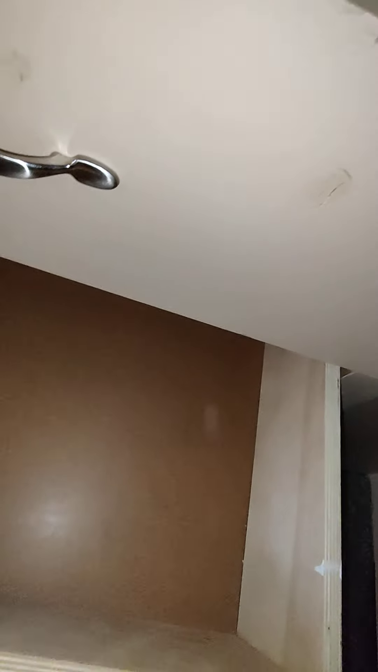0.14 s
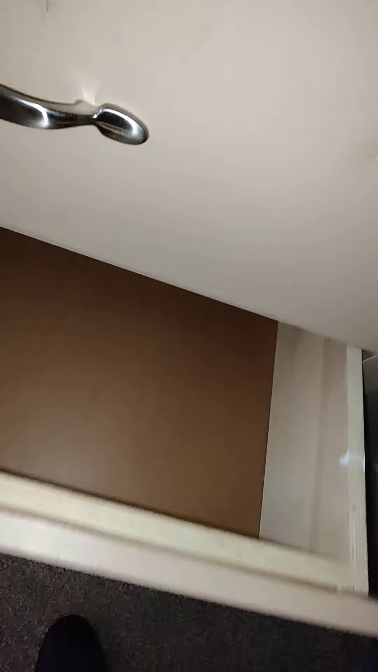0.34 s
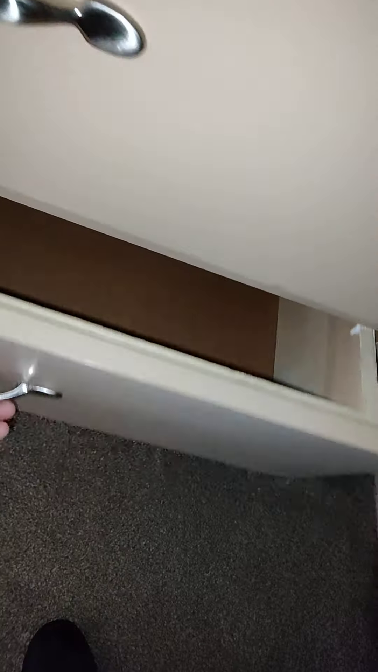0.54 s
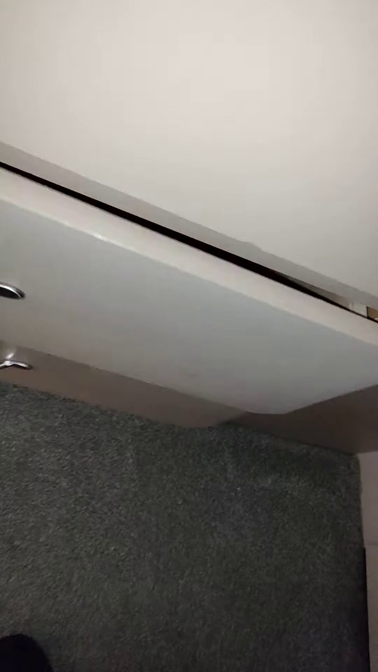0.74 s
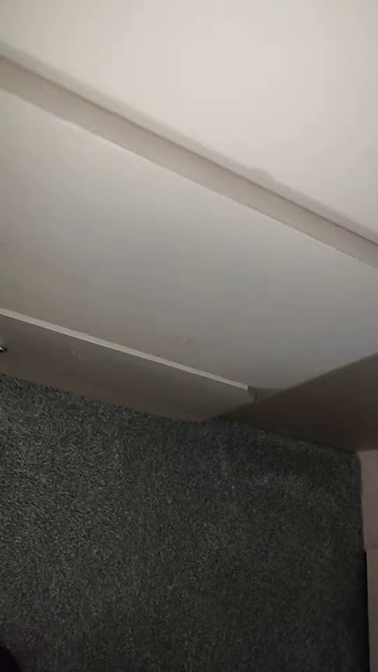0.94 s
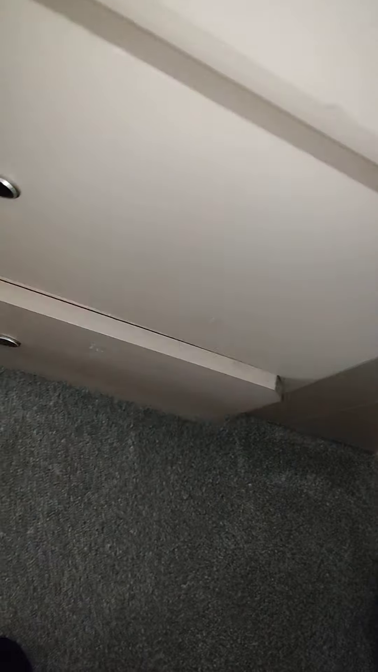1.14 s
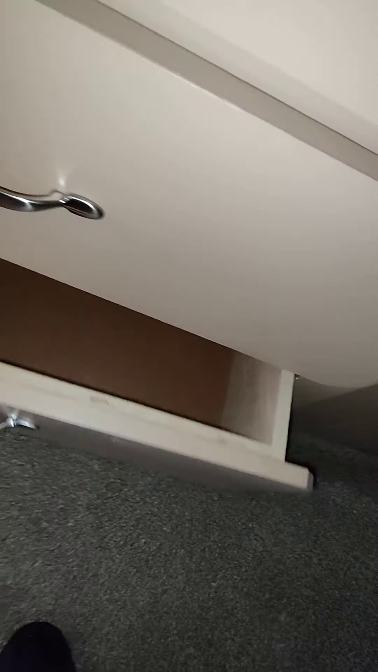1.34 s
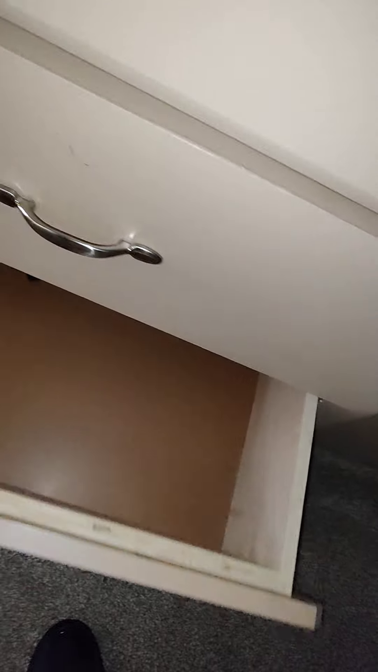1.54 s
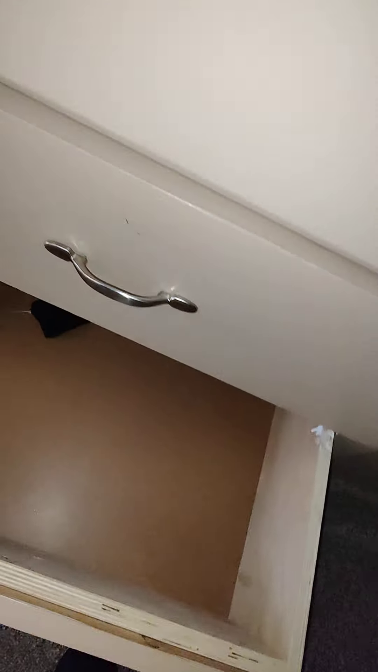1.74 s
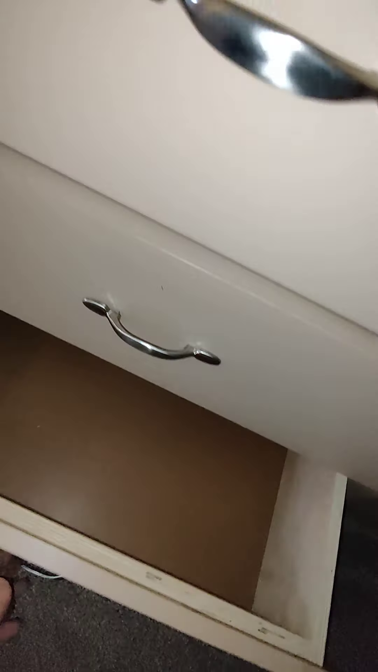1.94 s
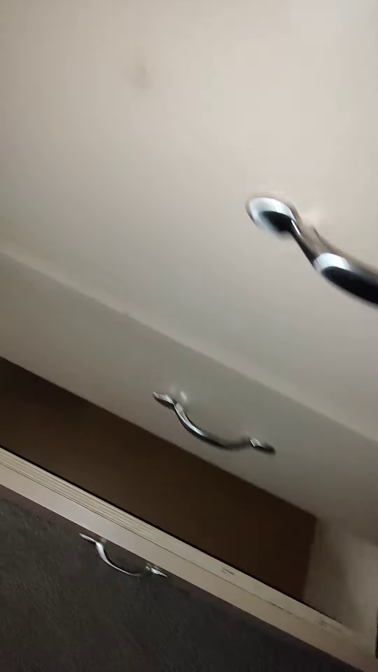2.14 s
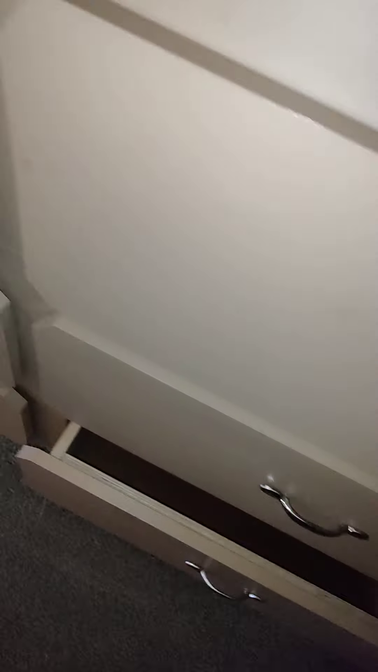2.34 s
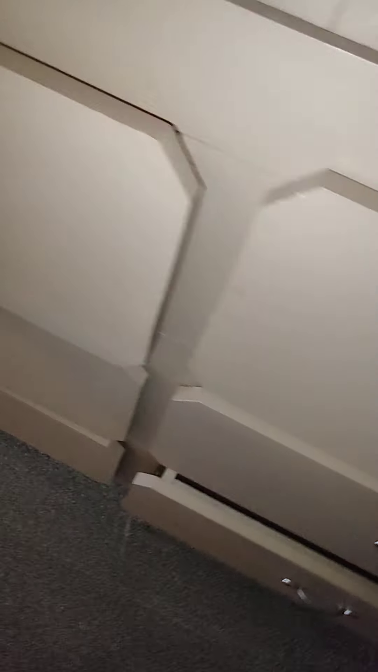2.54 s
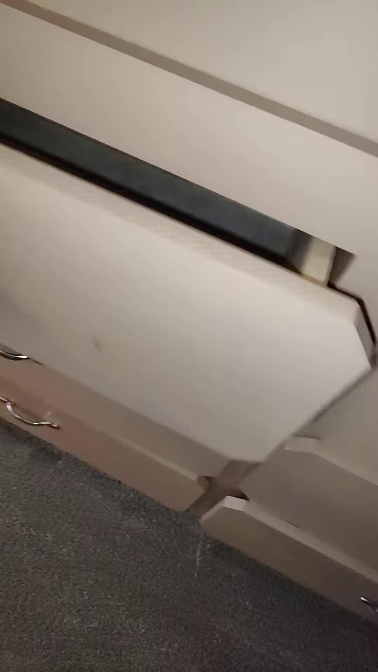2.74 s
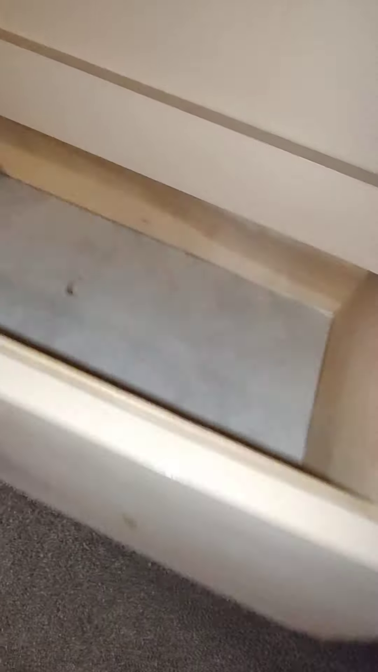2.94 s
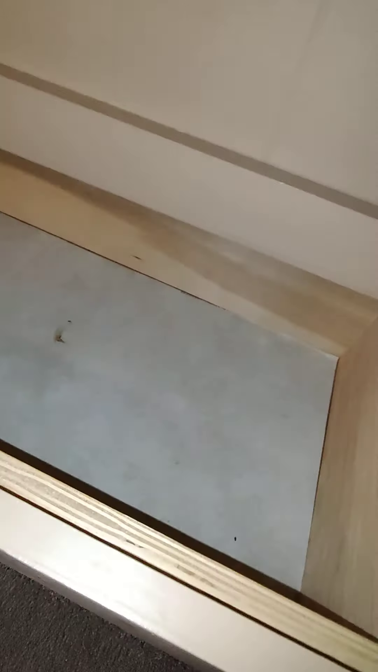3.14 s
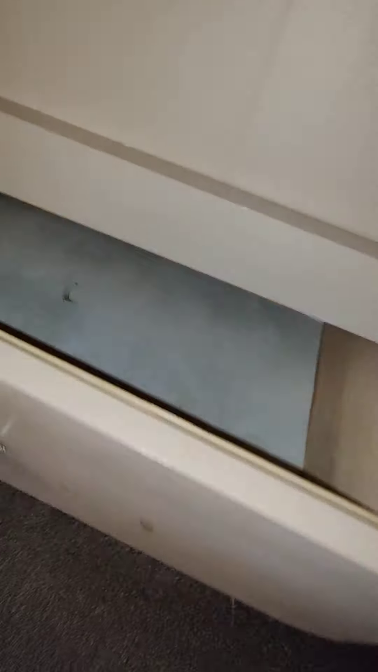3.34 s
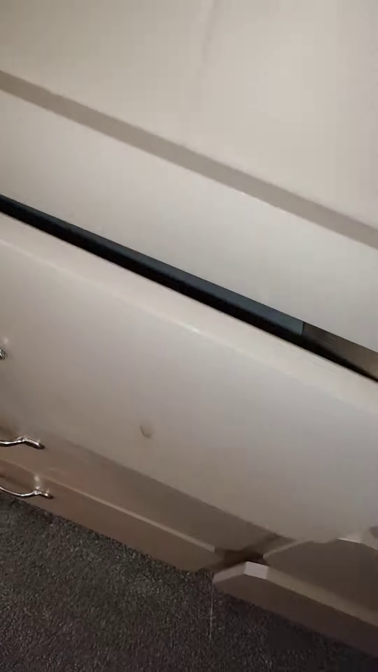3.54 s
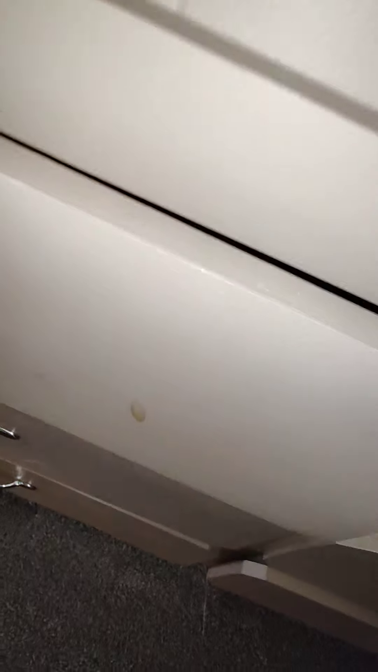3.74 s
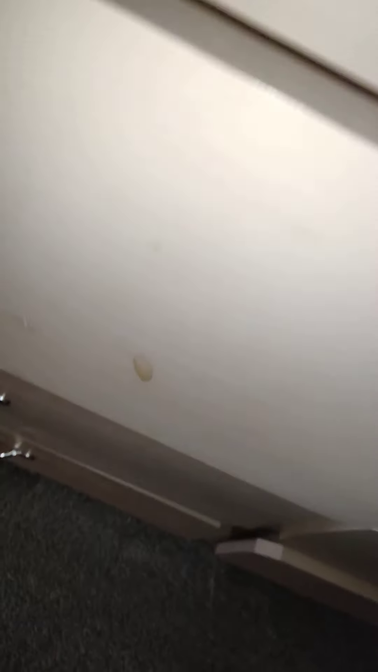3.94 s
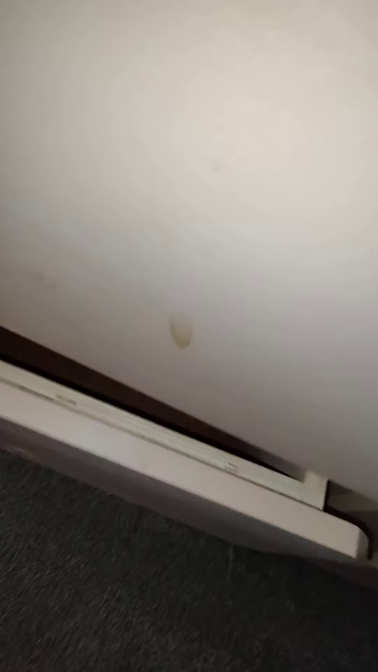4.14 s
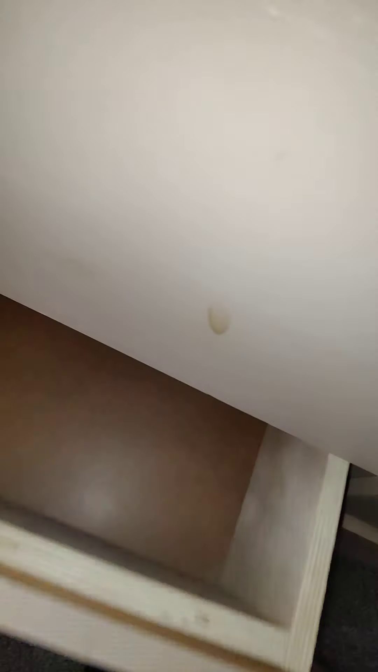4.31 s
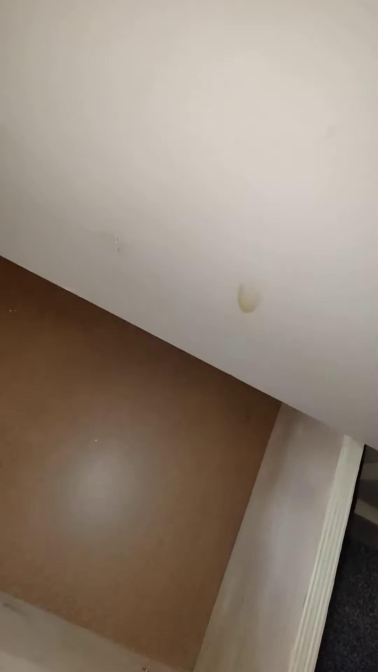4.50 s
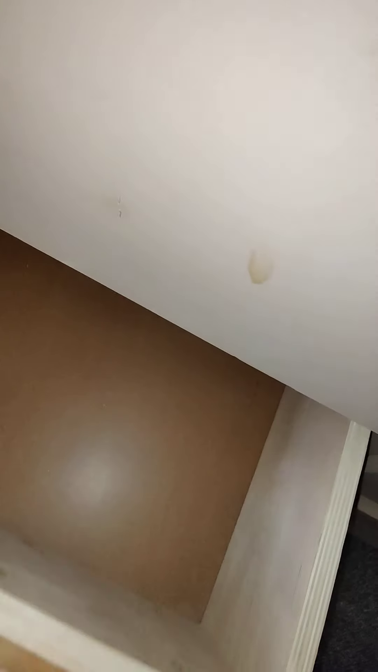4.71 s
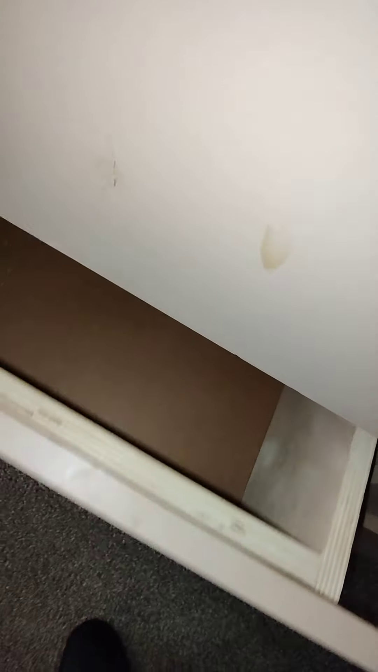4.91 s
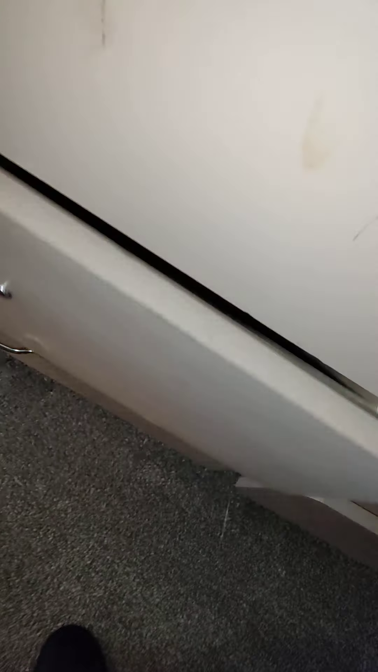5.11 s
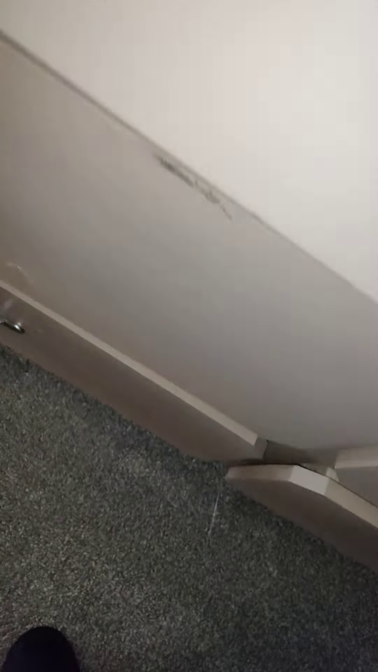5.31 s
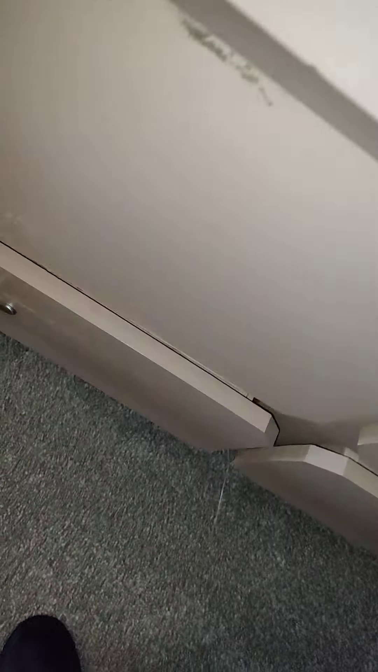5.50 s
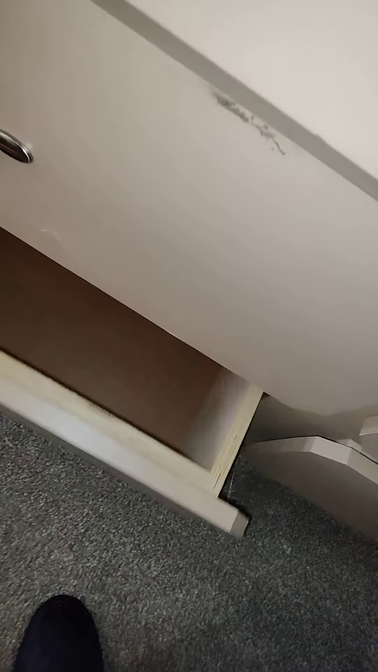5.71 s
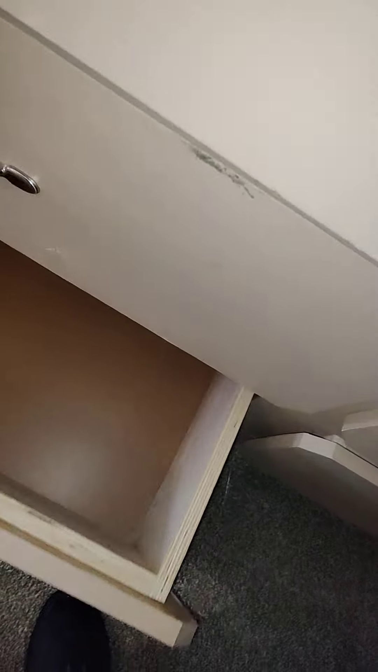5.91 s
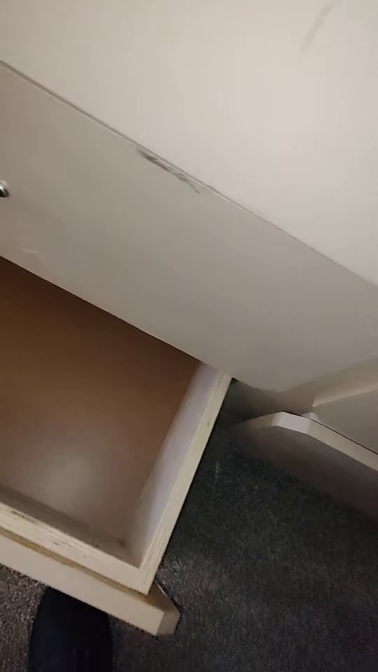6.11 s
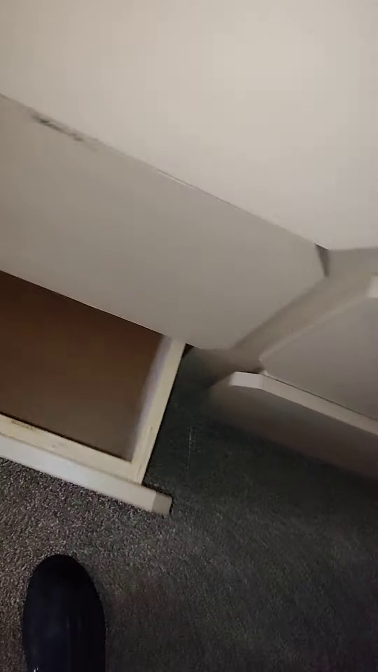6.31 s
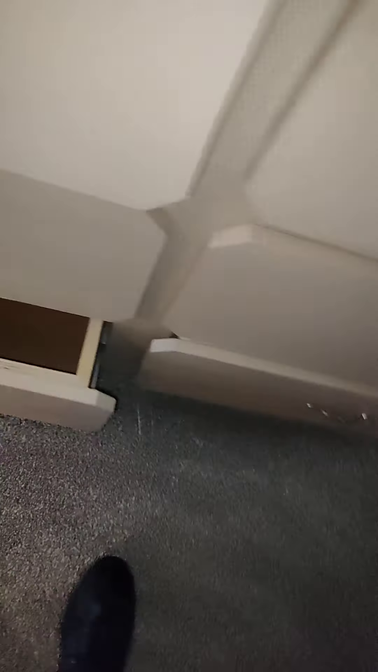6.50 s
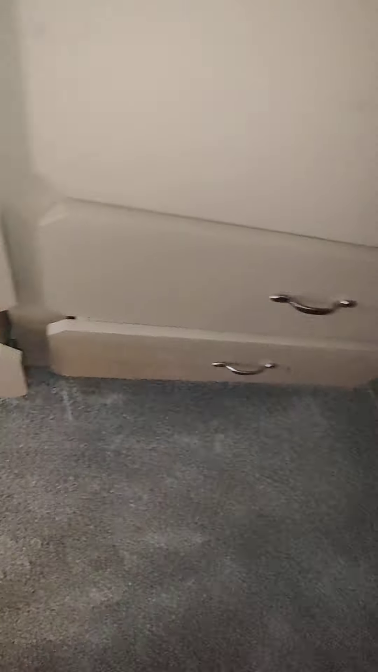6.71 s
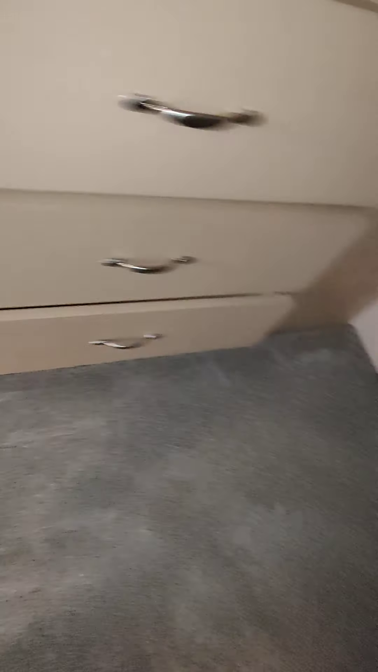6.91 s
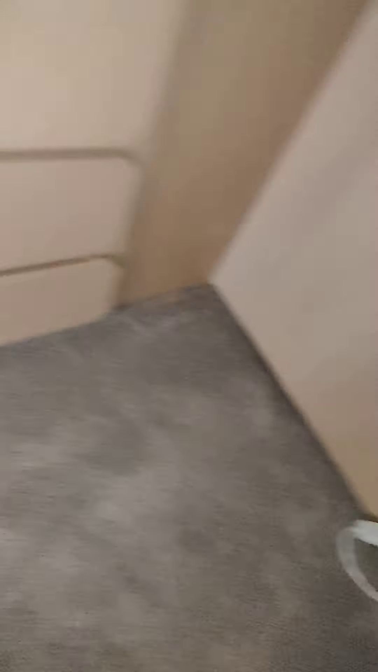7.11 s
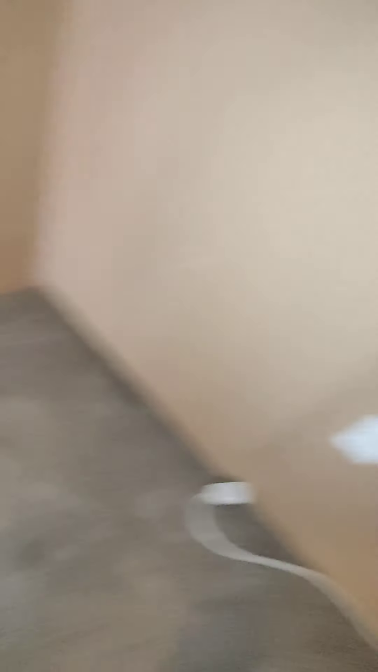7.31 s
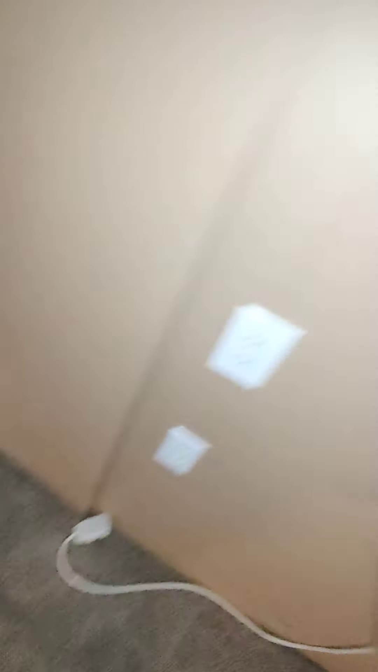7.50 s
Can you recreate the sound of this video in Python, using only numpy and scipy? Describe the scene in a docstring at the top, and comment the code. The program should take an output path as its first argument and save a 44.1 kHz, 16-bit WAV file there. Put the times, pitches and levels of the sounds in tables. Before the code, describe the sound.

Empty wooden dresser drawers slide and knock close to a hand-held microphone in a bare, carpeted room. A drawer knocks against its stop right at the start, rubs back in with clacks around 0.7 seconds and shuts with a hollow thud near 0.9. Another scrapes out and back between 1.3 and 2.6 seconds with softer bumps. At 3 seconds a drawer opens with a sharp knock and a metal handle rattle, then knocks again at 3.5. The next rumbles out to a bang at 4.5, knocks at 4.9 and slams shut at 5.3, the loudest blow, booming and briefly overloading the microphone. A last drawer slides from 5.6 seconds, with lighter knocks around 6 and 6.3. A soft low footstep follows near 6.4, and clothes swish and fade until about 7.5 seconds. Low handling rumble runs underneath.

```python
"""Wooden drawers of an empty dresser knock against their stops, pulled out and pushed shut in turn.
Each blow booms the case, thuds the thin bottoms and cracks the boards; some rattle the metal pulls.
Wood rubs on wood as each drawer runs. The last low thud is a footstep. The room is bare and carpeted.
Clothes swish, mostly at the end; the hand-held microphone rumbles, and the hardest slam overloads it."""
import sys
import numpy as np
from scipy import signal
from scipy.fft import rfft, irfft, next_fast_len
from scipy.io import wavfile

SR = 44100
rng = np.random.default_rng(int(sys.argv[2]) if len(sys.argv) > 2 else 0)


def inscribe(sig):
    """Save sig as 16-bit PCM at rate SR to the path in sys.argv[1].

    A 1-D sig is mono; a 2-D sig holds one channel per row.
    Samples are clipped to [-1, 1] before scaling.
    """
    pcm = np.round(np.clip(np.atleast_2d(sig).T, -1, 1) * 32767)
    wavfile.write(sys.argv[1], SR, pcm.astype(np.int16))


N = 332955
TIME = np.arange(N) / SR
FFT_SIZE = next_fast_len(N, True)
BINS_HZ = np.maximum(np.fft.rfftfreq(FFT_SIZE, 1 / SR), 1)

# drawer hits a stop or drops on its runners; the last low thud is a footstep:
# t/s, thud/dB, case rocking/dB, treble loss/dB, chatter/s, bottom f/Hz
BLOWS = [(0.041, -22, -32, 40, 0.013, 232), (0.107, -15, -17, 11, 0.0097, 238),
         (0.683, -15.5, -15.5, 21.5, 0.019, 217.6), (0.704, -12.5, -31, 17.5, 0.0068, 215.7),
         (0.798, -29, -29, 18.5, 0.019, 243), (0.947, -10.5, -8, 38.5, 0.026, 229),
         (1.156, -21.5, -24, 28, 0.0069, 207.7), (1.77, -26, -14, 16.5, 0.0081, 205),
         (2.451, -28.5, -50, 31, 0.024, 246), (2.625, -24.5, -50, 27.5, 0.03, 228),
         (2.948, -22.5, -30, 29, 0.034, 221), (3.015, -15, -33, 20, 0.006, 238),
         (3.089, -24.5, -35, 20, 0.03, 218), (3.335, -26, -51, 40, 0.01, 184),
         (3.511, -11, -34, 27, 0.008, 189), (3.635, -23.5, -26, 29, 0.027, 213),
         (4.109, -31.5, -30.5, 28, 0.01, 173), (4.486, -12, -17.5, 17, 0.008, 217.5),
         (4.902, -8, -25, 23, 0.0029, 206), (5.323, -2.5, 0, 34, 0.021, 223.3),
         (5.341, -5.5, -5, 30.5, 0.031, 225), (5.994, -19.5, -54, 26, 0.0052, 212),
         (6.093, -28, -24, 58, 0.0046, 221), (6.256, -22, -41, 38, 0.005, 182),
         (6.375, -34, -29, 22, 0.0057, 221)]
# modes of case, bottoms and side panels: f/Hz, level/dB, t60/s
CASE_MODES = [(40.7, -3, 0.4), (48, -9.5, 0.87), (64.4, -2, 0.64), (85.7, -5.5, 0.57), (130.4, -11.5, 0.45),
              (136.5, -6.5, 0.67), (208, -9, 0.5), (235.2, -27.5, 0.19), (253.3, -14, 0.51),
              (333, -17, 0.26), (384, -21.5, 0.46), (427.5, -8, 0.11), (486, -6.5, 0.32), (583, -8, 0.18),
              (600, -7, 0.21), (677.4, -11, 0.4), (955, -21, 0.17), (1086, -10.5, 0.21), (1270, -24, 0.23),
              (1553, -18.5, .16), (1810, -51, 0.21), (2190, -15.5, 0.098)]
def case_and_bottoms(modes_db=-3.0, spread_db=4.0, boom_db=-3.5, bottom_db=-7.0, lean_db=1.8):
    """Every blow rings the shared wooden modes, a hollow boom and a drawer bottom's note."""
    hz, mode_db, t60 = np.transpose(CASE_MODES)
    rings = np.array([ring(f, t) * (-1) ** k for k, (f, t) in enumerate(zip(hz, t60))])
    out = np.zeros(N)
    for blow in BLOWS:
        s, thud_db, *_, bottom_hz = blow
        boom_hz, _, ring_s, _ = voice_at(s)
        scatter_db = spread_db * rng.standard_normal(len(hz))
        add(out, s, from_db(drive_db(blow, hz) + mode_db + modes_db + scatter_db) @ rings)
        add(out, s, from_db(hollow_db(blow) + boom_db) * hollow_note(boom_hz, 0.85 * ring_s))
        add(out, s, from_db(thud_db + bottom_db) * hollow_note(bottom_hz, 0.51 * ring_s))
    return room(out, wet_db=-19.0, t60_s=0.14) * from_db([[lean_db], [-lean_db]])


def drive_db(blow, hz, panel_db=-11.5, loss_share=0.45):
    """A blow drives, low to high: case, hollow, bottom, panels, boards. Soft contacts lose treble."""
    thud, rocking, loss = blow[1:4]
    boom, panel, clack = hollow_db(blow), thud + panel_db, thud - loss_share * loss
    return at_hz([(60, rocking), (85, boom), (140, boom), (200, thud), (280, thud), (420, panel),
                  (650, panel), (1100, clack), (3000, clack), (6500, thud - loss)], hz)


def hollow_db(blow):
    """The bottom's thud and the case's rocking feed the hollow boom equally."""
    s, thud_db, rocking_db = blow[:3]
    return (thud_db + rocking_db) / 2 + voice_at(s)[1]


def hollow_note(hz, t60_s):
    """A struck drawer rings freely, then dies faster as it beds against its frame."""
    t = TIME[:SR]
    return np.sin(2 * np.pi * hz * t) * from_db(-60 * (t / t60_s) ** 1.52)


# open drawers: opened/s, shut/s, boom f/Hz, boom gain/dB, base ring time/s, rumble re rub/dB
OPEN_VOICES = [(0.0, 0.9, 125, -2.5, 0.39, 5), (1.26, 2.7, 102, -5, 0.44, -4.5),
               (2.74, 3.9, 145.8, 7.5, 0.2, 6), (4.17, 5.27, 93.3, 4, 0.36, 5),
               (5.6, 6.9, 134.3, -2, 0.32, -2.5)]
# shut case: boom f/Hz, boom gain/dB, base ring time/s, rumble re rub/dB
SHUT_VOICE = (76.5, -1.5, 0.4, 3)
def voice_at(s):
    """The hollow voice of the drawer standing open at time s, else of the shut case."""
    return next((voice for opened, shut, *voice in OPEN_VOICES if opened <= s < shut), SHUT_VOICE)


# crowded board modes: f/Hz, level/dB
BOARD_SPECTRUM = [(70, -10.5), (130, -7), (250, -6.5), (400, -5.5), (600, -6), (900, -9.5), (1400, -10),
                  (2400, -8.5), (3600, -14), (5000, -9.5), (7000, -1.5), (10000, -16), (15000, -12.5)]
# their tail in the room: f/Hz, t60/s
BOARD_TAILS = [(70, 0.47), (250, 0.41), (700, 0.37), (2500, 0.21), (7000, 0.23), (15000, .2)]
def boards(crack_db=-3.5, tail_db=-9.5, click_db=-14.5, rise_s=0.00054, spread_db=3.0):
    """A contact is a click, a burst of crowded modes while the joints chatter, and the room's tail."""
    edges_hz = np.geomspace(60, 17000, 23)
    centres_hz = np.sqrt(edges_hz[1:] * edges_hz[:-1])
    bands, t = len(centres_hz), TIME[:SR // 2]
    tails = from_db(tail_db - 60 * t / at_hz(BOARD_TAILS, centres_hz)[:, None]) ** 2
    power, clicks = np.zeros((2, bands, N)), np.zeros((bands, N))
    white = rng.standard_normal((2, 2, N))
    rattle = unit_rms(from_db(3.5 * drift(350))) ** 2   # separate tiny contacts
    for s, level_db, chatter_s, pan_db in contacts(centres_hz):
        scatter_db = spread_db * rng.standard_normal(bands)
        strength = from_db(level_db + at_hz(BOARD_SPECTRUM, centres_hz) + scatter_db)[:, None]
        burst = from_db(crack_db) ** 2 * np.exp(-t / chatter_s) * rattle[int(s * SR):][:len(t)]
        sides = from_db([[[pan_db]], [[-pan_db]]]) ** 0.5
        add(power, s, sides * strength ** 2 * (burst + tails) * (1 - np.exp(-t / rise_s)))
        add(clicks, s, strength * from_db(click_db) * np.sqrt(SR * 0.0015))
    out = np.zeros((2, N))
    for k, hz in enumerate(centres_hz):
        band = signal.butter(2, edges_hz[k:k + 2], "band", fs=SR, output="sos")
        width_hz = edges_hz[k + 1] - edges_hz[k]
        shaken = stereo(white[k % 2], hz) * np.sqrt(power[:, k] / 2) + clicks[k] * (-1) ** k
        out += signal.sosfilt(band, shaken + 1e-18) * np.sqrt(SR / 2 / width_hz)
    return out


# edges and joints clack without moving the case: t/s, level/dB, treble loss/dB
EDGE_CLACKS = [(0.0837, -22.5, 11), (0.151, -28.5, 7.5), (0.6798, -18.5, 19), (0.794, -29, 30),
               (0.9314, -26, 18), (0.9486, -25, 33), (1.1264, -34, 29), (1.158, -31, 46),
               (1.4237, -26.5, 33), (2.597, -33.5, 30), (1.864, -67, 2), (2.653, -29, 35),
               (3.007, -18.5, 2), (3.259, -42, 25), (3.5048, -17, 13), (4.001, -38.5, 28),
               (4.0375, -45, 31), (4.1104, -30, 19), (4.4819, -15.5, 11.5), (4.506, -22, 10),
               (4.5285, -23, 7), (4.8724, -22.5, 22), (5.3255, 1, 28.5), (5.5148, -25, 21),
               (5.992, -24, 32)]
def contacts(hz, clack_chatter_s=0.005):
    """Blows and clacks, scattered left and right: time, band levels, chatter time, pan."""
    heavy = [(blow[0], drive_db(blow, hz), blow[4]) for blow in BLOWS]
    light = [(s, at_hz([(150, db - 25), (1100, db), (3000, db), (6500, db - loss)], hz), clack_chatter_s)
             for s, db, loss in EDGE_CLACKS]
    return [(*contact, -0.5 - 2 * rng.standard_normal()) for contact in heavy + light]


# blows that rattle a pull: t/s, level/dB
PULL_JOLTS = [(0.107, -38), (0.948, -45), (1.428, -55), (3.01, -13.5), (3.028, -20), (4.111, -40),
              (4.484, -39), (5.325, -20.5)]
# metal pull, damped by the wood: f/Hz, level/dB, t60/s
METAL_MODES = [(2115, -10, 0.035), (2410, -1, 0.045), (2810, 6, 0.03), (2990, 4, 0.03), (3230, 0, 0.028),
               (4900, -5, 0.018), (7300, -12, 0.02)]
def pulls(rattle_s=0.0043, level_db=-0.5, lean_db=3.0):
    """A jolted pull buzzes on its screws for a few milliseconds."""
    t = TIME[:SR // 10]
    metal = sum(from_db(db) * ring(hz, t60)[:len(t)] for hz, db, t60 in METAL_MODES)
    out = np.zeros((2, N))
    for s, db in PULL_JOLTS:
        buzz = rng.standard_normal((2, len(t))) * np.exp(-t / rattle_s) / np.sqrt(rattle_s * SR / 2)
        add(out, s, from_db(db + level_db) * signal.fftconvolve(buzz, metal[None], axes=1))
    return room(out * from_db([[lean_db], [-lean_db]]), wet_db=-7.0, t60_s=0.22)


# single wooden notes: t/s, f/Hz, level/dB, t60/s
WOODEN_NOTES = [(0.948, 580, -23, 0.1), (1.128, 1480, -32.5, 0.029), (1.160, 1417, -23.5, 0.036),
                (1.160, 624, -23, 0.052), (2.601, 850, -23.5, 0.021), (3.021, 424, -11.5, 0.097),
                (3.511, 470, -18, 0.1), (4.037, 1206, -34, 0.032), (4.11, 1180, -43, 0.2),
                (4.50, 42, -23, 0.53), (4.51, 233.5, -20.5, 0.49), (4.902, 557, -14.5, 0.093),
                (4.902, 211, -5.5, 0.26), (5.327, 1250, -32, 0.088), (6.256, 456, -28.5, 0.1)]
def wooden_notes():
    """Panels ring briefly as a drawer is gripped, tips or lands; once the case rocks with a deep boom."""
    out = np.zeros(N)
    for s, hz, db, t60 in WOODEN_NOTES:
        add(out, s, from_db(db) * ring(hz, t60))
    return room(out, wet_db=4.0, t60_s=0.067)


# wood-on-wood rub, rasp and rumble: f/Hz, density/dB
RUB_SPECTRUM = [(260, -6.5), (330, -0.5), (394, 8), (460, -0.5), (620, -4), (760, -2), (900, -8),
                (1200, -14)]
RASP_SPECTRUM = [(600, 3), (780, 0), (1050, 0), (1350, 1.5), (1600, -6.5), (2350, -4.5), (3200, -16),
                 (4400, -23.5), (5700, -25), (7000, -18), (9300, -42), (15500, -52)]
RUMBLE_SPECTRUM = [(50, -12), (80, -9.5), (135, -1), (175, -13), (215, 0), (270, -5), (360, -21.5)]
def sliding(rub_db=1.0, rumble_db=-0.5, rasp_db=2.0, sleeve_db=-60.0, judder_db=1.23, catch_db=2.5):
    """Runners catch and slip in tiny steps; the uneven push judders, and a sleeve brushes along."""
    rub, rumble, rasp, moving = stroke_gains()
    rubbing = from_db(rub_db) * rub * noise(RUB_SPECTRUM, grain_db=-1.0, grain_hz=150.0)
    rumbling = from_db(rumble_db) * rumble * noise(RUMBLE_SPECTRUM)
    rough_spots_db = catch_db * np.clip(drift(rate_hz=45.0) - 1, 0, 2)
    rasping = from_db(rasp_db + rough_spots_db) * rasp * noise(RASP_SPECTRUM, grain_db=1.5, grain_hz=400)
    sleeve = from_db(sleeve_db) * moving * noise(CLOTH_SPECTRUM)
    judder = from_db(judder_db * drift(rate_hz=25))
    return (through_wood(rubbing + rasping) + rumbling + sleeve) * judder


# drawer runs: start/s, braking/s, mid-stroke level/dB, swell over stroke/dB, rasp re rub/dB
DRAWER_RUNS = [(-0.06, 0.1, -37, -12, 4.5), (0.318, 0.69, -39, -2, -3), (1.277, 1.746, -34.5, 0, -9),
               (1.932, 2.348, -38, -12.5, -11), (2.681, 3.012, -41.5, 12, -3.5),
               (3.267, 3.524, -41.5, 12.5, -1), (4.178, 4.486, -37.5, 5.5, -1.5),
               (4.711, 4.903, -36.5, 8, -4), (4.905, 5.333, -41, -11.5, -3.5),
               (5.615, 6.033, -32, -7, -7.5), (6.287, 6.79, -41, -18, -13.5)]
def stroke_gains(speed_up_s=0.11, stop_s=0.096, rasp_exponent=1.7):
    """A drawer speeds up, swells or fades with the push, and stops; rasp grows faster than rub."""
    rub, rumble, rasp, moving = np.zeros((4, N))
    for start, brake, db, swell_db, rasp_db in DRAWER_RUNS:
        middle = (start + brake) / 2
        speed = np.clip((TIME - start) / speed_up_s, 0, 1) * np.clip(1 - (TIME - brake) / stop_s, 0, 1)
        push = from_db(db + swell_db * np.clip((TIME - middle) / (brake - start), -.5, .5))
        rub += push * speed
        rumble += push * speed * from_db(voice_at(middle)[3])
        rasp += push * speed ** rasp_exponent * from_db(rasp_db)
        moving += speed
    return rub, rumble, rasp, moving


def through_wood(friction, width_hz=45.5, contrast_db=4.5):
    """Friction is heard through the drawer, whose upper modes stand out of the hiss."""
    peaks = sum(1 / (1 + (2 * (BINS_HZ - hz) / width_hz) ** 2) for hz, *_ in CASE_MODES if hz > 500)
    gain = from_db(contrast_db * (np.minimum(peaks, 1) - 0.57))
    return irfft(rfft(friction, FFT_SIZE) * gain, FFT_SIZE)[..., :N]


# fabric moves as arm and body turn: peak t/s, rise/s, fall/s, level/dB
BRUSH_MOVES = [(2.29, 0.055, 0.057, -65), (2.47, 0.04, 0.75, -64), (3.75, 0.1, 0.11, -67),
               (6.49, 0.039, 0.067, -60), (6.71, 0.11, 0.38, -52.5), (7.34, 0.08, 0.03, -63)]
SWISH_MOVES = [(2.25, 0.027, 0.11, -52), (6.51, 0.037, 0.13, -40.5)]
SQUEAK_MOVES = [(2.18, 0.011, 0.09, -53), (6.472, 0.011, 0.032, -48)]
# brush, swish and squeak: f/Hz, density/dB
CLOTH_SPECTRUM = [(500, -14), (900, -3), (2000, -7.5), (3200, -5), (4500, -9), (7000, -5), (10000, -11.5),
                  (13000, -17.5), (16000, -23)]
SWISH_SPECTRUM = [(2300, -3), (2900, -12.5), (3300, 2), (3700, -11), (5300, -34), (6400, -3), (7100, 6),
                  (7800, -6.5), (9500, -36)]
SQUEAK_SPECTRUM = [(7000, -12), (8200, 5), (9900, -20), (11600, -5), (12800, -14), (13900, -3),
                   (15500, -14)]
def clothes(brush_db=8.0, swish_db=1.5):
    """Fabric on fabric: a soft broad hiss, narrow bands from the weave, a thin squeak as it slips."""
    def envelope(moves):
        return sum(from_db(db) * swell(s, rise, fall) for s, rise, fall, db in moves)
    brush = from_db(brush_db) * envelope(BRUSH_MOVES) * noise(CLOTH_SPECTRUM, grain_db=1.5)
    swish = from_db(swish_db) * envelope(SWISH_MOVES) * noise(SWISH_SPECTRUM)
    squeak = envelope(SQUEAK_MOVES) * noise(SQUEAK_SPECTRUM, grain_db=3.0)
    return brush + swish + squeak


# grip on the microphone, settling at the end: t/s, level/dB
GRIP_LEVELS = [(0.0, -43.5), (6.3, -45), (6.9, -50), (7.55, -63)]
# hand and floor rumble: f/Hz, density/dB
GRIP_SPECTRUM = [(12, -7), (25, 9.5), (45, -5.5), (80, -6.5), (130, -11.5), (260, -24.5), (600, -59)]
def hand_and_floor(level_db=2.5, shudder_db=-24, rocking_share=0.58):
    """Lumpy rumble of the holding hand, and of the floor shuddering after each blow."""
    power = from_db(np.interp(TIME, *np.transpose(GRIP_LEVELS))) ** 2
    for s, _, rocking_db, *_ in BLOWS:
        shudder = from_db(shudder_db + rocking_share * rocking_db) * swell(s, rise_s=0.013, fall_s=0.23)
        power += shudder ** 2
    return from_db(level_db) * np.sqrt(power) * noise(GRIP_SPECTRUM, grain_db=1.5, grain_hz=5.8)


# hand shifts: peak t/s, rise/s, fall/s, level/dB, L-R/dB
HAND_SHIFTS = [(2.58, 0.11, 0.098, -29.5, 0), (2.97, 0.1, 0.066, -25, 15), (7.36, 0.23, 0.16, -39.5, -25)]
# their thump: f/Hz, density/dB
THUMP_SPECTRUM = [(12, 0), (27, -0.5), (45, -2), (80, -11), (260, -32)]
def hand_bumps(level_db=1.0):
    """The hand shifts on the microphone with a deep thump."""
    envelope = sum(from_db([[db + pan / 2], [db - pan / 2]]) * swell(s, rise, fall)
                   for s, rise, fall, db, pan in HAND_SHIFTS)
    return from_db(level_db) * envelope * noise(THUMP_SPECTRUM)


# noise floor: f/Hz, density/dB
AIR_SPECTRUM = [(35, -23), (60, 2.5), (180, -11.5), (238, -13), (354, -14.5), (417, -12.5), (515, -17.5),
                (1660, -25), (2350, -24.5), (4420, -36), (6000, -37.5), (6900, -28.5), (9350, -46.5),
                (16000, -44.5)]
def air(level_db=-45.0):
    """Still air and microphone hiss."""
    return from_db(level_db) * noise(AIR_SPECTRUM)


def room(x, wet_db, t60_s):
    """Bare walls return a dense, short tail, different left and right."""
    t = TIME[:SR // 2]
    tail = rng.standard_normal((2, len(t))) * from_db(-60 * t / t60_s) * (t > .004)
    tail /= np.sqrt(np.sum(tail ** 2, axis=1, keepdims=True))
    return x + from_db(wet_db) * signal.fftconvolve(np.atleast_2d(x), tail, axes=1)[:, :N]


# channel likeness: f/Hz, correlation
CORRELATION = [(60, 1), (250, 0.86), (500, 0.72), (1000, 0.09), (2500, -0.05), (15000, 0)]
# channel balance: f/Hz, L-R/dB
BALANCE = [(60, 3.5), (250, 2), (600, 4), (1300, 3), (2300, -2), (4000, 7.5), (8000, 2), (14000, 2)]
def stereo(pair, hz):
    """Two unrelated signals become left and right: alike in the bass, apart in the treble."""
    alike = np.clip(at_hz(CORRELATION, hz), -.99, .99)
    sides = np.array([[1], [-1]])
    mixed = np.sqrt(1 + alike) * pair[0] + np.sqrt(1 - alike) * pair[1] * sides
    return mixed * from_db(sides * at_hz(BALANCE, hz) / 2)


def noise(spectrum, grain_db=0.0, grain_hz=300.0):
    """Coloured stereo noise of unit power; grain makes its level flicker."""
    white = rng.standard_normal((2, N))
    if grain_db:
        white *= from_db(grain_db * drift(grain_hz))
    low_hz, high_hz = spectrum[0][0], spectrum[-1][0]
    skirts = np.minimum(1, BINS_HZ / low_hz) ** 3 * np.minimum(1, high_hz / BINS_HZ) ** 3
    coloured = stereo(rfft(white, FFT_SIZE), BINS_HZ) * from_db(at_hz(spectrum, BINS_HZ)) * skirts
    return unit_rms(irfft(coloured, FFT_SIZE)[:, :N])


def drift(rate_hz, step=8, points=2 ** 16):
    """Slow random wander of unit RMS."""
    white = rfft(rng.standard_normal(points))
    slow = irfft(white / (1 + (np.fft.rfftfreq(points, step / SR) / rate_hz) ** 2))
    return unit_rms(np.interp(np.arange(N) / step, np.arange(points), slow))


def ring(hz, t60_s):
    """One struck mode, a second long."""
    return np.sin(2 * np.pi * hz * TIME[:SR]) * from_db(-60 * TIME[:SR] / t60_s)


def swell(s, rise_s, fall_s):
    """Gaussian rise to a peak at time s, then exponential decay."""
    depth = np.where(TIME < s, ((TIME - s) / rise_s) ** 2, (TIME - s) / fall_s)
    return np.exp(-np.minimum(depth, 40))


def add(out, s, sound):
    """Mix a sound in at time s."""
    at = int(s * SR)
    out[..., at:at + sound.shape[-1]] += sound[..., :N - at]


def at_hz(points, hz):
    """Interpolate a table along log frequency."""
    table_hz, values = np.transpose(points)
    return np.interp(np.log(hz), np.log(table_hz), values)


def from_db(db):
    """Decibels to gain."""
    return 10 ** (np.asarray(db) / 20)


def unit_rms(x):
    """Scale to unit power."""
    return x / np.sqrt(np.mean(x ** 2) + 1e-20)


def scene():
    """The dresser, the person at it and the room."""
    dresser = case_and_bottoms() + boards() + pulls() + wooden_notes() + sliding()
    return dresser + clothes() + hand_and_floor() + hand_bumps() + air()


def record(dry, limit_db=-2.0, attack_s=0.048, release_db_per_s=20.0, ceiling=0.88, cutoff_hz=15900):
    """Gain dips after the hardest blows and recovers, peaks are flattened, the top is cut."""
    over_db = np.maximum(20 * np.log10(np.abs(dry).max(axis=0) + 1e-9) - limit_db, 0)
    held_db = np.maximum.accumulate(over_db + release_db_per_s * TIME) - release_db_per_s * TIME
    pole = np.exp(-1 / (attack_s * SR))
    limited = dry * from_db(-signal.lfilter([1 - pole], [1, -pole], held_db))
    clipped = limited / (1 + (limited / ceiling) ** 6) ** (1 / 6)
    return signal.sosfilt(signal.ellip(10, .1, 80, cutoff_hz, fs=SR, output="sos"), clipped)


dry = scene()
out = record(dry)
inscribe(out)
```